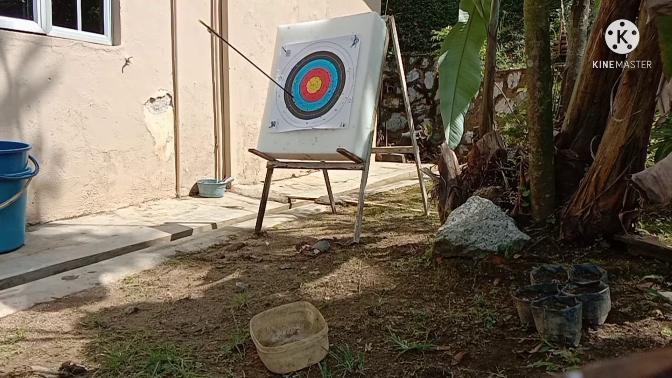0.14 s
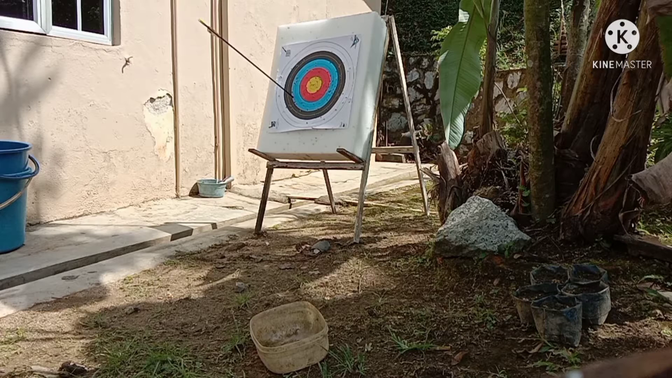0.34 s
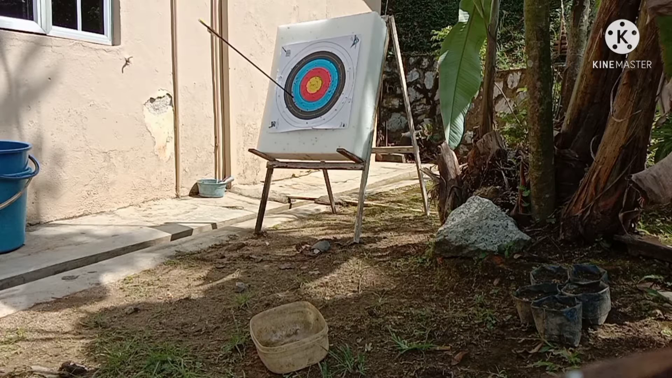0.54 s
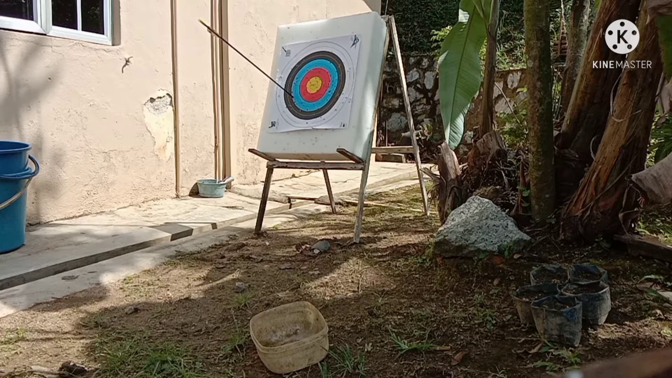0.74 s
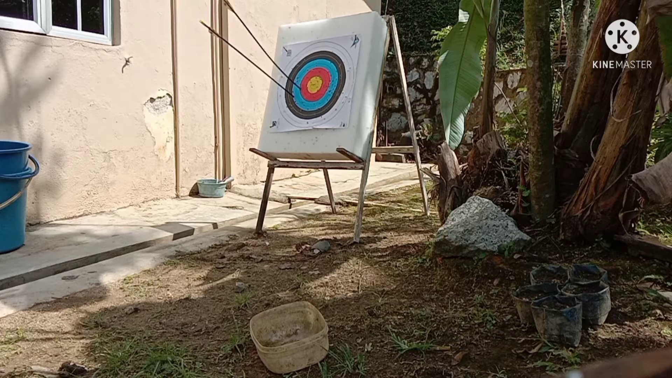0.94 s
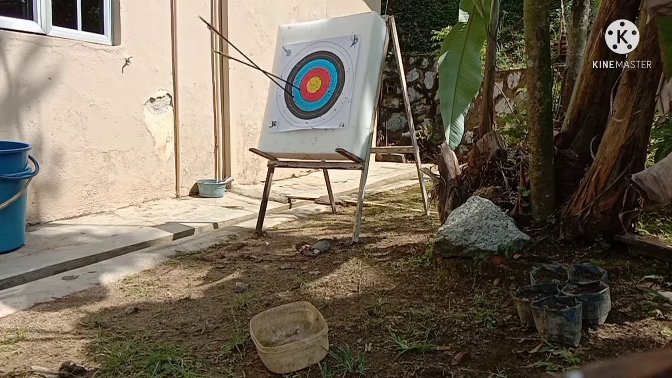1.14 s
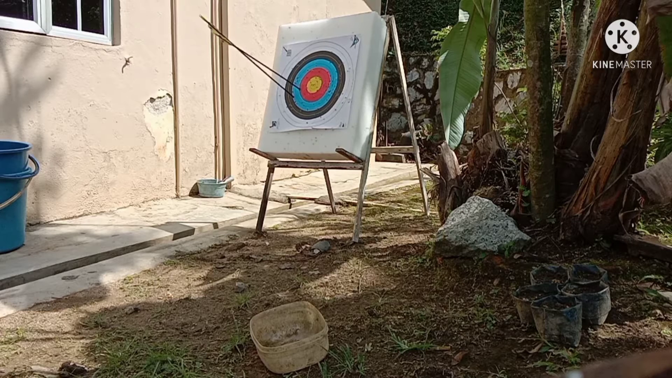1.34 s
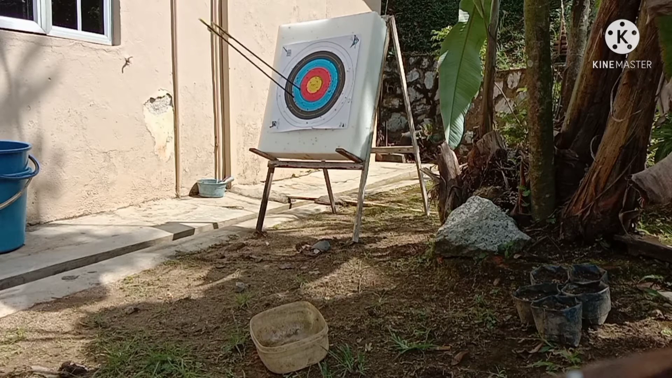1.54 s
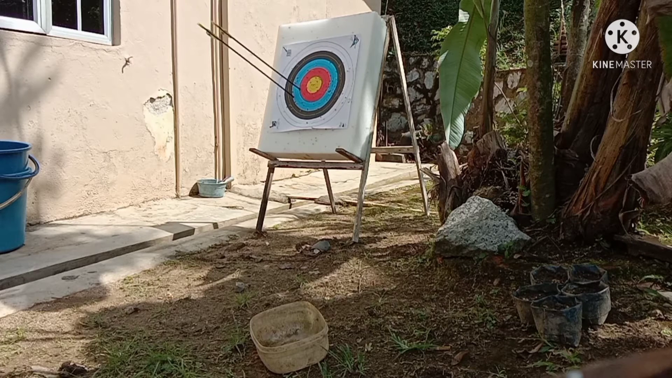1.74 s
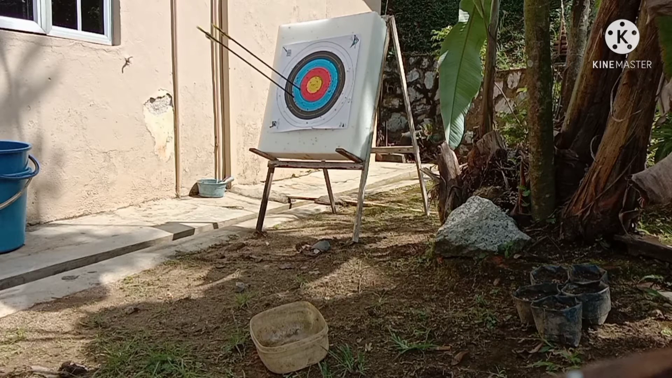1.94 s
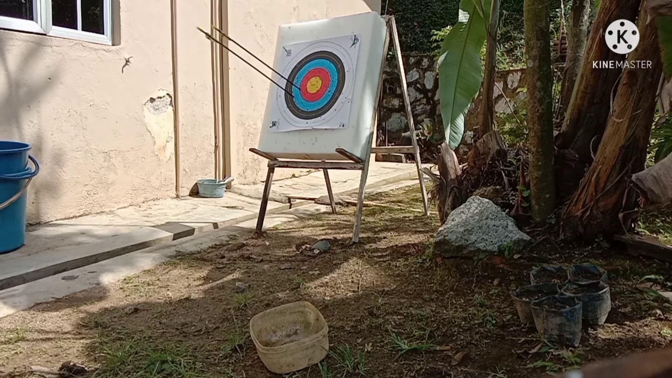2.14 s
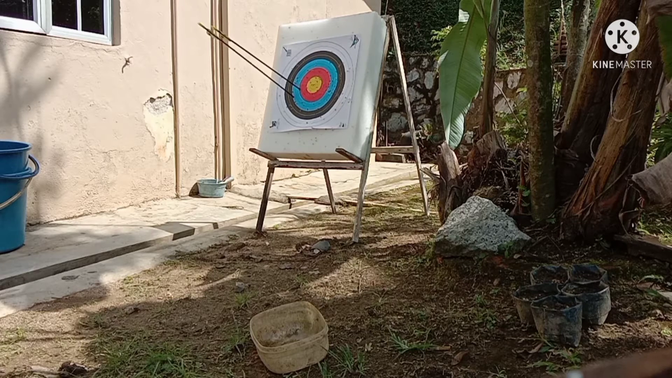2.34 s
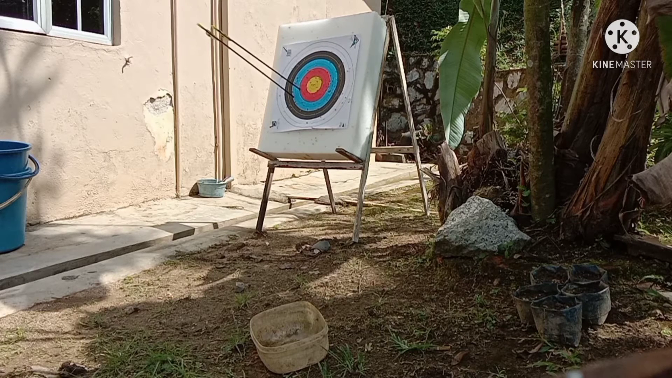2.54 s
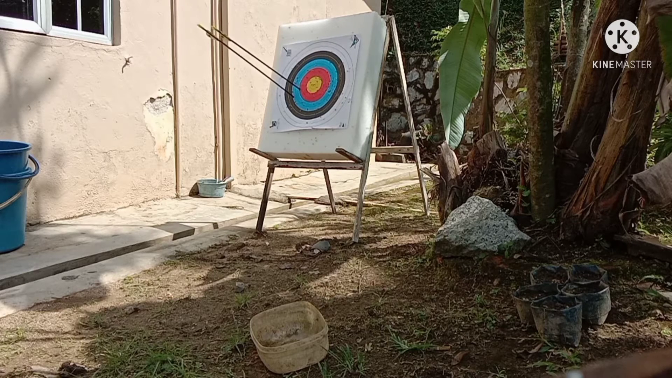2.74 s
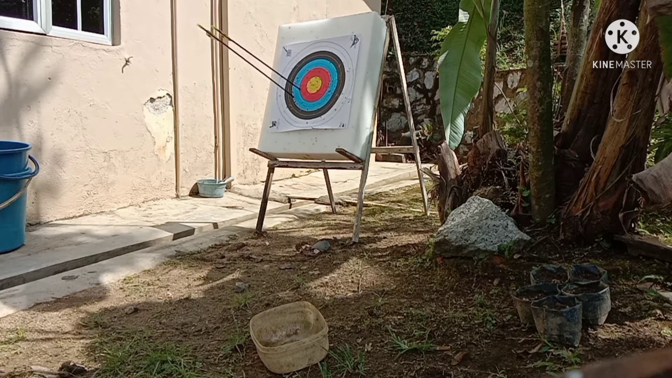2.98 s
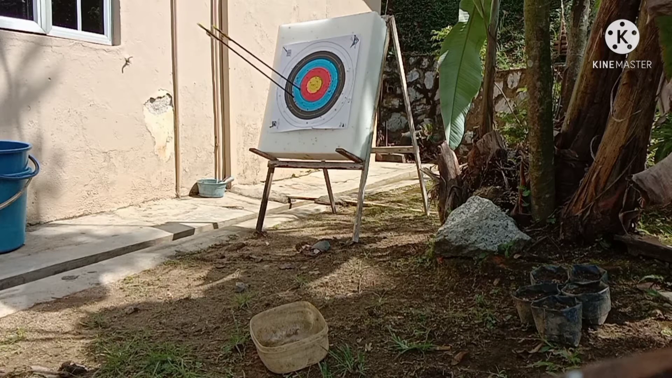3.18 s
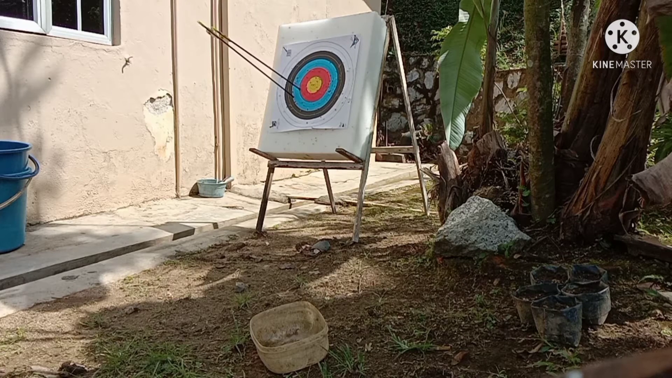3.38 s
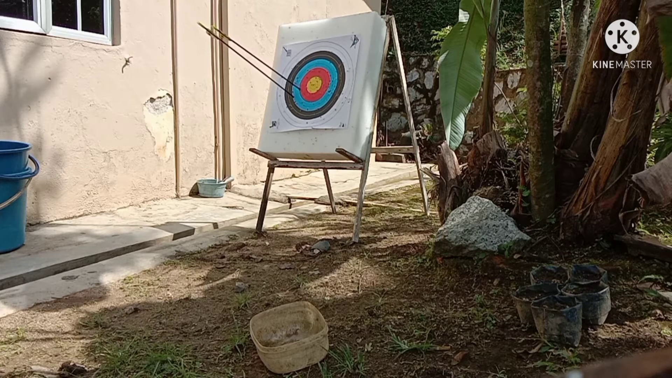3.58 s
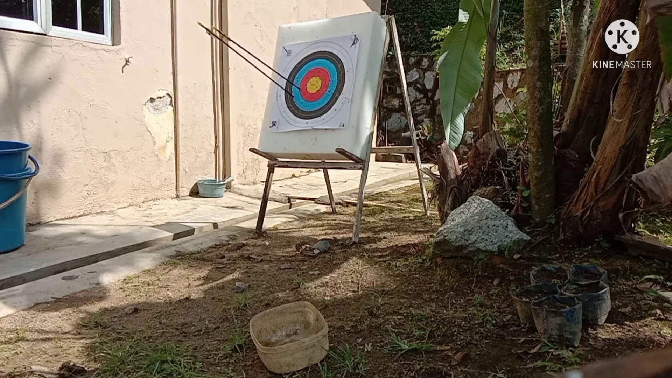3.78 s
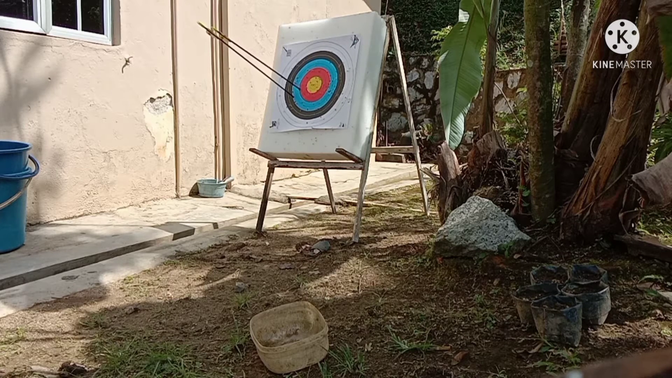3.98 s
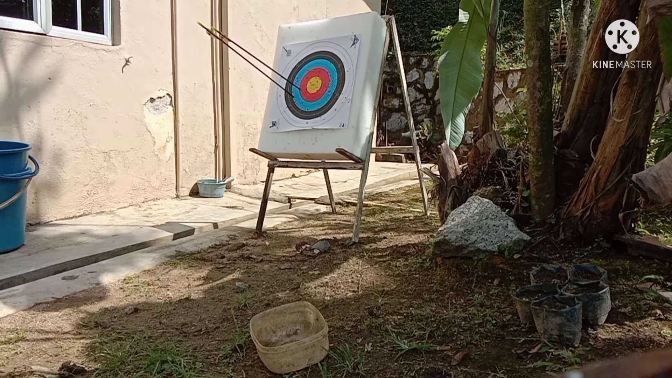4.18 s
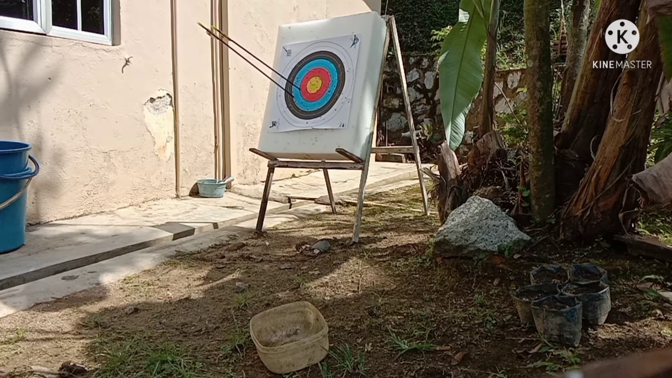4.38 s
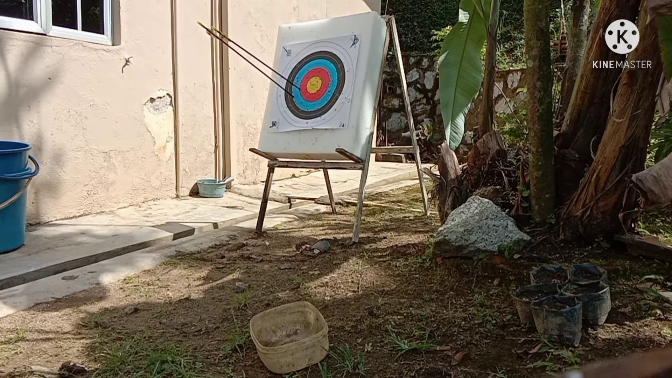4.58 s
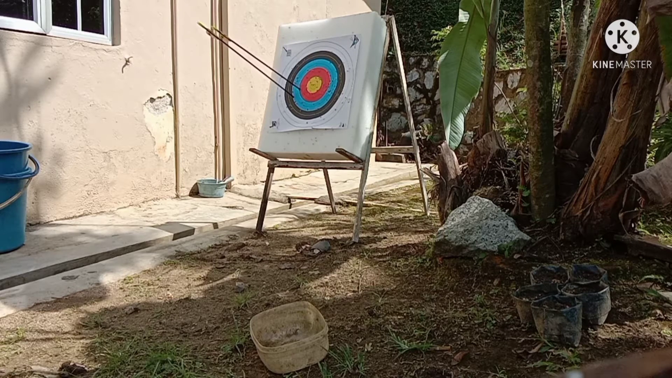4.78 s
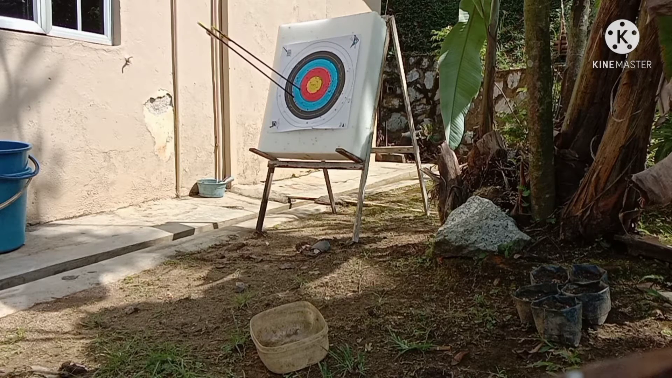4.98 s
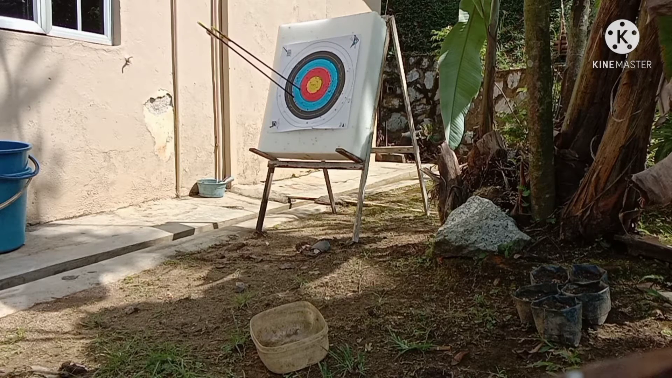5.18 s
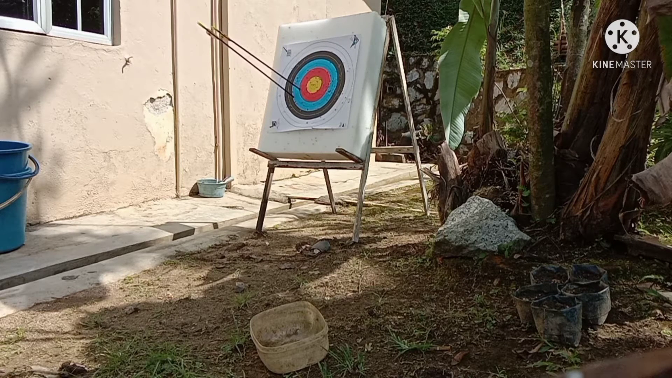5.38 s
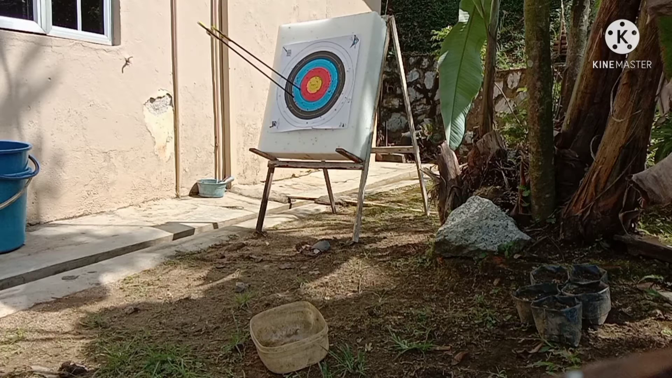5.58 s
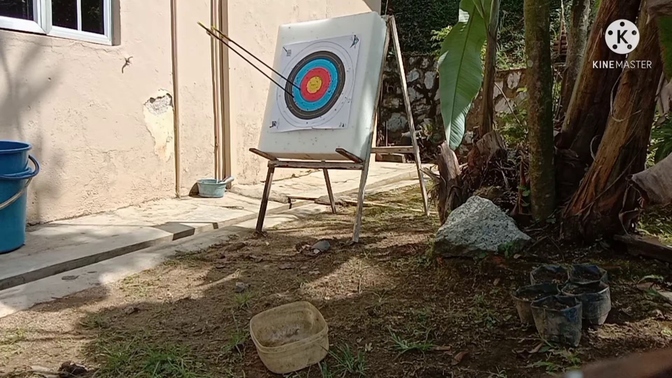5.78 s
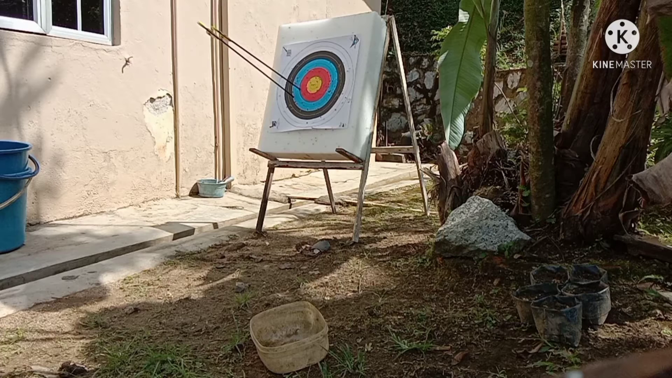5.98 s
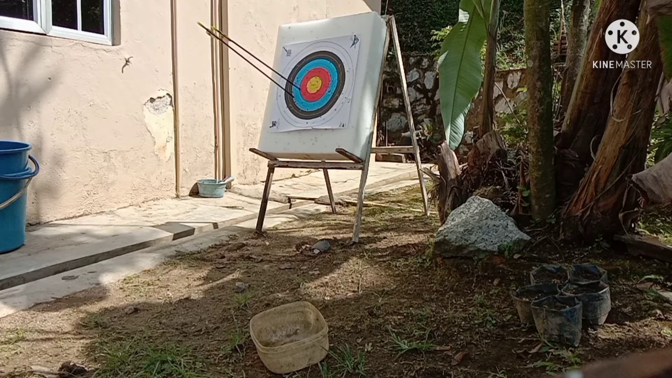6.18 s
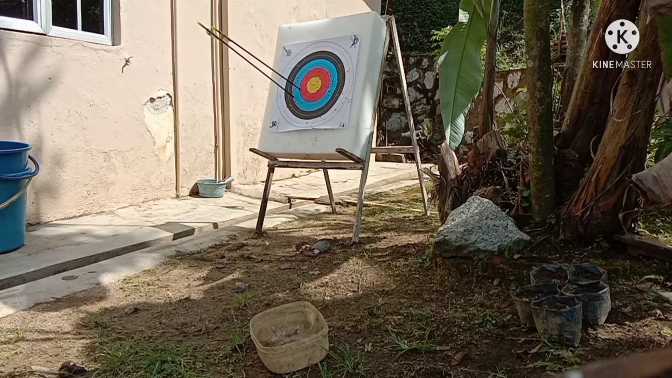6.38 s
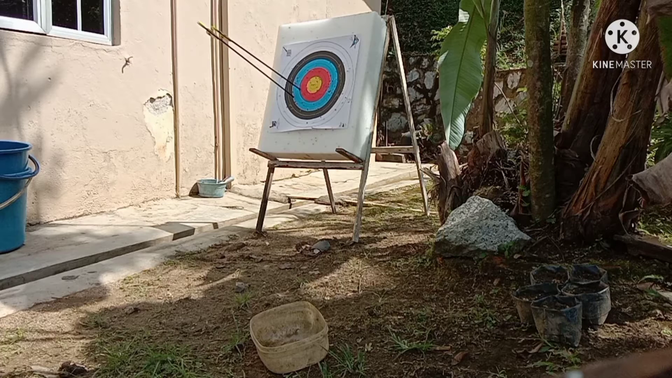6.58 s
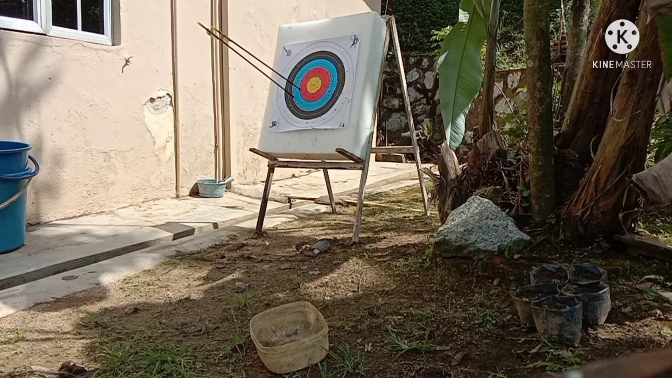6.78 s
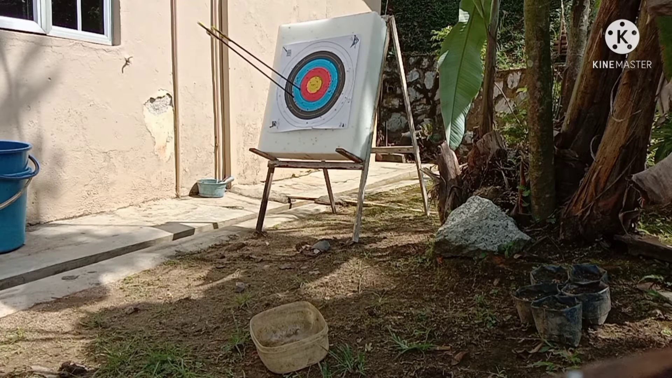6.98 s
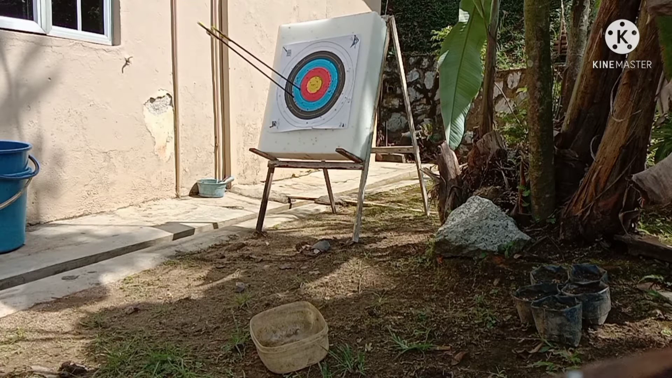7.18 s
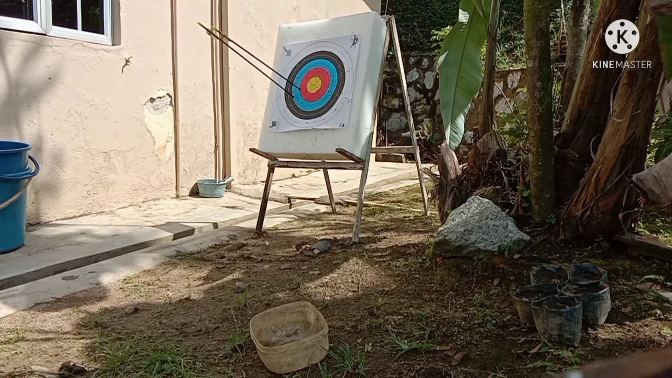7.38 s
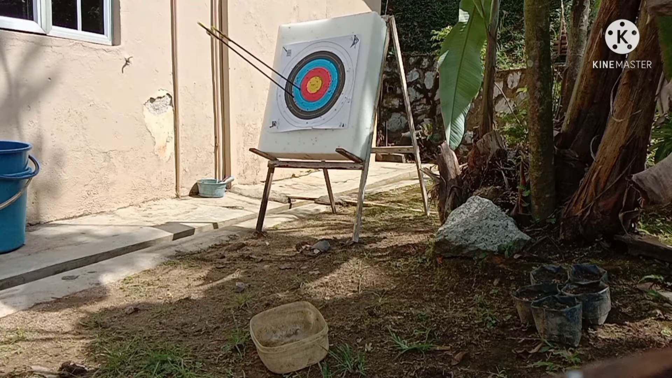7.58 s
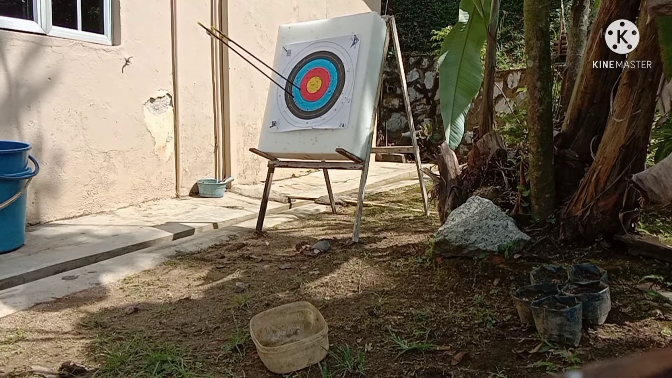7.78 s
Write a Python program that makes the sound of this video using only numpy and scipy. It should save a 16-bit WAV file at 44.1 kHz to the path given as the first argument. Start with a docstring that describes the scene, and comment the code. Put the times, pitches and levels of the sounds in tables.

```python
"""Archery in a walled garden.

The bow twangs and rattles; the arrow punches into a foam block on a wooden easel and a wall
throws the thud back. The lodged shaft quivers, spare arrows click together, the next is drawn.
Cicadas, crickets and katydids buzz over a distant rumble; far birds call faintly."""
import sys
import numpy as np
from scipy import signal
from scipy.fft import rfft, irfft, next_fast_len
from scipy.io import wavfile
from scipy.ndimage import uniform_filter1d, map_coordinates

SR = 44100
rng = np.random.default_rng(int(sys.argv[2]) if len(sys.argv) > 2 else 0)


def output_pcm(signal):
    """Save a mono or channel-first signal as 16-bit PCM at the path in sys.argv[1].

    Samples are clipped to [-1, 1] before scaling.
    """
    pcm = np.clip(np.atleast_2d(signal).T, -1, 1) * 32767
    wavfile.write(sys.argv[1], SR, np.round(pcm).astype(np.int16))


N = 345303
HIT_S = 0.9137

# garden reverberation: freq_hz, t60_s
GARDEN_DECAY = [(150, 0.45), (500, 0.5), (1000, 0.58), (3000, 0.47), (7000, 0.29), (14000, 0.22)]
# cicada hiss: freq_hz, density_db
CICADA_SPECTRUM = [(5500, -47), (5900, -36), (6080, -25), (6170, -11), (6400, -4), (6550, -15.5),
                   (6850, -9.5), (7020, -1.5), (7350, -1), (7720, -4.5), (8150, -15), (8500, -29.5),
                   (9500, -57.5), (13700, -35), (14500, -25.5), (15500, -29)]
# cricket choirs: pitch_hz, width_hz, level_db, pulse_hz, pulse_depth
CRICKET_CHOIRS = [(6192, 24, -68.5, 13, .65), (6300, 45, -72, 26, .4), (6362, 22, -68.5, 24, .5)]
# steady near cricket: start_s, length_s, level_db, pulse_depth, pulse_hz
STEADY_TRILLS = [(0, 3, -77, 0.5, 14), (2.802, 1.86, -74.5, 0.9, 16), (4.46, 1.62, -75, .75, 19),
                 (5.989, 1.15, -80.5, 0.6, 14), (7.09, 0.95, -89, 0.92, 15)]
# rising near cricket: start_s, length_s, start_hz, level_db
RISING_TRILLS = [(2.85, 4.1, 5920, -80), (6.9, 1.3, 5978, -72.5)]
# far, low cricket: start_s, length_s, pitch_hz, level_db
TREE_CRICKET_CHIRPS = [(.56, .13, 3060, -76), (1.33, 0.097, 3056, -76), (2.68, 0.053, 3050, -82),
                       (2.98, 0.072, 3060, -79), (3.61, .07, 3034, -78), (3.73, 0.063, 3050, -82.5),
                       (3.99, 0.072, 3047, -79), (4.29, 0.083, 3046, -79), (5.54, .08, 3080, -86),
                       (5.72, 0.084, 3040, -83), (6.3, .11, 3047, -77), (7.06, 0.23, 2950, -81)]
# far traffic and moving air: freq_hz, density_db
RUMBLE_SPECTRUM = [(20, -30), (45, -16), (70, -8.5), (100, 1), (140, -6), (180, -3.5), (260, -10),
                   (450, -21.5), (900, -62)]
RUSH_SPECTRUM = [(100, -21), (300, -3.5), (480, -3.5), (750, -0.5), (1150, -2.5), (1600, -10),
                 (2300, -16.5), (3500, -20.5), (5200, -27), (8500, -35), (10000, -78.5), (15000, -35.5)]
# soft bumps in the rumble: centre_s, level_db, pitch_hz
RUMBLE_BUMPS = [(0.035, -56, 98), (.49, -63.5, 325.5), (1.08, -53, 95.5), (1.156, -58.5, 110.2),
                (1.86, -60, 99), (2.129, -58, 98.06), (4.455, -60, 305.2), (5.22, -56.5, 97.6),
                (5.412, -62, 97), (6.138, -59, 100), (7.08, -62, 97.7), (7.68, -66.5, 300.7)]
# bird and katydid calls: start_s, length_s, pitch_hz, level_db
FAR_BIRD_NOTES = [(.13, 0.16, 744, -67), (.29, 0.052, 1280, -70.5), (.36, 0.039, 890, -65),
                  (.56, 0.084, 906, -68.5), (1.12, 0.14, 901, -63), (1.25, 0.19, 980, -64.5),
                  (1.86, 0.35, 895, -71), (6.84, .15, 1120, -72), (7.22, 0.051, 1254, -67),
                  (7.49, 0.13, 947, -65.5), (7.54, 0.097, 715, -67), (7.74, 0.072, 712, -66)]
KATYDID_PHRASES = [(0.18, 0.35, 12020, -80), (1.05, 1.54, 11710, -85.5), (3.22, 0.35, 12060, -76.5),
                   (3.6, 1.64, 11650, -88.5), (4.92, 0.37, 11740, -83), (5.3, 1.1, 12080, -104),
                   (6.35, 1.8, 11670, -89), (7.38, 0.42, 11920, -80.5)]
SMALL_BIRD_PEEPS = [(.452, .04, 3870, -73.5), (2.3, .09, 3655, -68.5), (2.644, 0.097, 3707, -67)]

# contacts of spare arrows, and of string, arrow and rest at release:
# start_s, level_db, tilt_db_per_decade, t60_s, ring_pitch_ratio, comb_spacing_hz
SHAFT_CONTACTS = [(0.14, -73, -21, 0.057, 1.12, 1330), (3.3135, -51.5, -6.5, 0.041, 1.0, 1620),
                  (3.3245, -56.5, -12, 0.06, 0.98, 1130), (3.4028, -44, -2, 0.02, 0.99, 1780),
                  (3.4052, -41.5, -14, 0.016, .99, 1420), (3.4118, -45, -7, 0.031, 1, 1760),
                  (3.4215, -49, -20, 0.031, 1, 1720), (3.4356, -32.5, 2.5, 0.0096, 1, 1530),
                  (3.4376, -39.5, 12, 0.012, 1, 1100), (3.4872, -49, 6, 0.014, .97, 1450),
                  (7.345, -75, -10, 0.06, .94, 800), (7.475, -75, -2, 0.081, 1.1, 2020)]
BOW_CONTACTS = [(0.7235, -44.5, -4.5, 0.16, 1.18, 1049), (0.7305, -43, 3.5, 0.06, 1, 1401),
                (0.7342, -45.5, 4, 0.16, 0.96, 948), (0.7587, -37, 9, .02, 0.81, 1020),
                (0.7624, -29, -5.5, .016, 1, 997.8), (0.767, -44.5, 3.5, .17, 1, 1900),
                (0.8192, -40, -5.5, 0.017, 1.3, 1020), (0.854, -51, -7.5, 0.034, 1.04, 999.4)]
# contact bursts: freq_hz, density_db
SHAFT_SPECTRUM = [(500, -44), (880, -22.5), (1300, -42), (1680, -14.5), (1950, -27), (2280, -5),
                  (2480, -13), (2700, -5.5), (3100, -4.5), (3650, -5), (4250, -8), (4700, -6.5),
                  (7500, -6.5), (9000, -17), (11000, -38), (14500, -19.5), (16000, -30)]
BOW_SPECTRUM = [(100, -30), (300, -26), (600, -18.5), (800, -19), (950, -26), (1200, -22.5), (1650, -29),
                (1950, -7), (2200, -4), (2450, -9), (2850, -8.5), (3850, -6.5), (4860, -11), (8050, -9.5),
                (11600, -26), (14700, -15), (16000, -27.5)]
# resonances rung by the contacts: centre_hz, width_hz, gain_db
SHAFT_RESONANCES = [(900, 27, 7), (1704, 40, -3.5), (2293, 29, 4.5), (2630, 29, 0), (3082, 39, 0),
                    (3320, 39, -8.5), (3610, 34, 2), (4500, 64, -3), (4770, 63, -2), (5320, 55, 1)]
BOW_RESONANCES = [(2180, 93, 2), (2880, 78, -6), (3445, 90, -5), (3900, 130, -1), (4610, 50, -6)]
# bowstring and bow limbs: freq_hz, level_db, t60_s
STRING_MODES = [(87.47, -51, 1), (119, -52.5, .77), (240.6, -66, 0.29)]
LIMB_MODES = [(604, -52.5, 0.46), (760, -54.5, 0.24), (1430, -54.5, 0.42)]

# paper face tearing, its scatter, block catching the shaft, block on easel: freq_hz, density_db
CRACK_SPECTRUM = [(25, -35), (55, -15), (150, -7.5), (330, -8.5), (480, -10), (600, -2.5), (790, -11.5),
                  (1100, -4.5), (1650, -6.5), (1880, -16.5), (2180, -6), (2650, -18), (3200, -5.5),
                  (5600, -23), (7700, -22), (10000, -41.5), (14500, -26.5), (16000, -41)]
SCATTER_SPECTRUM = [(150, -31), (280, -2), (360, -4.5), (520, -9), (800, -4.5), (1200, -5), (1900, -11),
                    (2700, -16), (3120, -9.5), (4900, -17.5), (7570, -21), (11100, -34.5), (14900, -26.5),
                    (16000, -51.5)]
CATCH_SPECTRUM = [(100, -20), (330, 3), (520, 3), (800, -10), (2200, -12), (3500, -10), (5500, -13),
                  (8000, -15), (10500, -30), (15000, -32)]
KNOCK_SPECTRUM = [(100, -24.5), (300, -6), (600, -1), (1000, 2), (1400, -7.5), (2200, -18), (3100, -13),
                  (5000, -24), (8000, -28.5), (14000, -42.5)]
# easel with lodged shaft, and foam block: freq_hz, gain_db, t60_s
EASEL_MODES = [(234, 0, 0.08), (297, -2.5, .11), (363, -2.5, .2), (471, -13, 0.211), (562, -11, 0.27),
               (601, -4, .2), (726, -10, 0.19), (794, -11, 0.19), (950, -8, 0.3), (1028, -10, .25),
               (1100, -8.5, .25), (1220.3, -5.5, 0.23), (1328, -11.5, 0.27), (1404, -6, 0.12),
               (1616, -7.5, 0.17), (1740, -16, 0.17), (2210, -12.5, .08), (2510, -20, 0.26),
               (2990, -18, 0.3), (3120, -13.5, .22), (3476, -15, 0.12), (3840, -19.5, .2)]
BLOCK_MODES = [(134.1, -5.5, 0.18), (178, -2, 0.19)]
# buzz of the lodged shaft: centre_hz, width_hz, gain_db
BUZZ_RESONANCES = [(900, 22, 0), (1180, 25, 1), (1683, 28, 0), (2150, 45, -3), (3090, 35, 1),
                   (3120, 50, -5), (3690, 50, -9.5), (3900, 40, -2), (4100, 40.04, -6), (5270, 25, -5)]
# block rocking against the easel: start_s, level_db
BLOCK_KNOCKS = [(0.9395, -30), (0.9525, -28.5), (0.9612, -31)]

# handled shafts squeaking: start_s, length_s, pitch_hz, level_db
SHAFT_BRUSHES = [(2.2, 0.14, 4650, -83), (2.9, 0.067, 1830, -79), (3.17, .16, 2390, -76),
                 (4.69, .06, 1580, -65), (4.945, .065, 2940, -68)]
# pulls of the draw: start_s, length_s, level_db, pitch_ratio, fall_ratio, hiss_db
DRAW_PULLS = [(4.441, 0.4, -59.5, 1, 0.01, -0.5), (4.829, 0.19, -68.5, 0.92, 0.1186, -9)]
# tones of the sliding shaft: pitch_hz, width_hz, gain_db
RUB_TONES = [(1620, 57, -6.5), (1890, 36, -12), (2480, 85, -6), (2875, 120, -6.5), (3220, 72, -1),
             (3760, 190, -2.5), (4110, 130, 0), (4640, 97, -6.5)]
# hiss of the sliding shaft: freq_hz, density_db
RUB_SPECTRUM = [(900, -29.5), (2200, -15), (2650, -1.5), (3900, -1.5), (4700, -7), (5300, -13), (8500, -21),
                (10500, -56)]


def amp(db):
    """Decibels to gain."""
    return 10 ** (np.asarray(db) / 20)


def unit(x):
    """Scale to rms 1."""
    return x / np.sqrt(np.mean(x ** 2) + 1e-20)


def along(points, hz):
    """Interpolate (freq_hz, value) points on a log axis."""
    freqs_hz, values = np.transpose(points)
    return np.interp(np.log(hz + 1), np.log(freqs_hz + 1), values)


def wobble(rate_hz, size=N):
    """Smooth random curve with knots at rate_hz."""
    knots = rng.standard_normal(int(size * rate_hz / SR) + 4)
    return map_coordinates(knots, [np.arange(size) * rate_hz / SR])


def filtered(x, response):
    """Apply a frequency response."""
    size = next_fast_len(len(x) + SR // 4)
    return irfft(rfft(x, size) * response(np.fft.rfftfreq(size, 1 / SR)), size)[:len(x)]


def noise(spectrum, size):
    """Coloured noise, rms 1."""
    return unit(filtered(rng.standard_normal(size), lambda hz: amp(along(spectrum, hz))))


def band(hz, width_hz, size):
    """Blurred line around a fixed or gliding pitch, rms about 1."""
    lowpass = lambda f: 1 / (1 + (f / width_hz) ** 2) ** 2
    real, imag = [unit(filtered(rng.standard_normal(size), lowpass)) for _ in range(2)]
    cycles = np.cumsum(np.broadcast_to(hz, size)) / SR
    return np.real((real + 1j * imag) * np.exp(2j * np.pi * cycles))


def ringing(modes, t):
    """Sum of decaying sines."""
    return sum(amp(db - 60 * t / t60_s) * np.sin(2 * np.pi * hz * t) for hz, db, t60_s in modes)


def attack(t, rise_s):
    """Exponential onset."""
    return 1 - np.exp(-t / rise_s)


def add(track, start_s, sound):
    """Mix sound into track."""
    part = track[round(start_s * SR):][:len(sound)]
    part += sound[:len(part)]


def garden_decay(x):
    """Fade each frequency at the garden's rate."""
    hz, t, bins = signal.stft(x, SR, nperseg=256)
    fade = amp(-60 * t / along(GARDEN_DECAY, hz)[:, None])
    return signal.istft(bins * fade, SR, nperseg=256)[1][:len(x)]


def reverb(x, wet_db):
    """Add the diffuse return from walls and trees."""
    tail = garden_decay(rng.standard_normal(SR // 2))
    return x + amp(wet_db) * signal.fftconvolve(x, tail / np.linalg.norm(tail))[:len(x)]


def whistles(calls, rise_ratio, width_hz):
    """Distant notes, blurred by foliage."""
    out = np.zeros(N)
    for start_s, length_s, hz, db in calls:
        size = int(length_s * SR)
        glide_hz = hz * (1 + rise_ratio * np.linspace(-.5, .5, size))
        add(out, start_s, amp(db) * band(glide_hz, width_hz, size) * signal.windows.tukey(size, .5))
    return out


def cicadas(start_db=-60.5, fade_db_per_s=0.34):
    """Broad hiss, slowly easing off."""
    t = np.arange(N) / SR
    return amp(start_db - fade_db_per_s * t + .3 * wobble(14)) * noise(CICADA_SPECTRUM, N)


def trill(hz, pulse_hz, depth, drift_hz):
    """One cricket: a near-pure wing tone in quick, uneven pulses."""
    strokes = np.cumsum(pulse_hz * (1 + .2 * wobble(11))) / SR
    tone = np.sin(2 * np.pi * np.cumsum(hz + drift_hz * wobble(78)) / SR)
    pulses = 1 - depth * np.cos(np.pi * strokes) ** 2
    return amp(1.2 * wobble(8)) * unit(tone * pulses)


def cricket_choirs(blur_db=-1):
    """In each choir one pulsing voice leads the blur of the rest."""
    out = np.zeros(N)
    for hz, width_hz, db, pulse_hz, depth in CRICKET_CHOIRS:
        leader = trill(hz, pulse_hz, depth, drift_hz=11)
        out += amp(db) * unit(leader + amp(blur_db) * band(hz, width_hz, N))
    return out


def near_crickets(steady_hz=5697, rise_hz_per_s=36):
    """One cricket holds its pitch; a second joins late and creeps upward in each trill."""
    out, t = np.zeros(N), np.arange(N) / SR

    def bout(song, length_s):
        size = int(length_s * SR)
        return song[:size] * signal.windows.tukey(size, .05)

    for start_s, length_s, db, depth, pulse_hz in STEADY_TRILLS:
        song = trill(steady_hz, pulse_hz, depth, drift_hz=6.4)
        add(out, start_s, amp(db) * bout(song, length_s))
    for start_s, length_s, hz, db in RISING_TRILLS:
        song = trill(hz + rise_hz_per_s * t, pulse_hz=13, depth=0.81, drift_hz=14)
        add(out, start_s, amp(db) * bout(song, length_s))
    return out


def tree_cricket(pitch_hz=3055, line_db=-93):
    """Far, low cricket: clear chirps over a faint steady line."""
    line = amp(line_db) * band(pitch_hz, width_hz=45, size=N)
    chirps = whistles(TREE_CRICKET_CHIRPS, rise_ratio=0, width_hz=55)
    return line + reverb(chirps, wet_db=-6)


def air_drift(x, depth_db):
    """Drifting air lifts and drops small patches of a far sound's spectrum."""
    bins = signal.stft(x, nperseg=1024)[2]
    patches = uniform_filter1d(rng.standard_normal(bins.shape), size=4, axis=0)
    patches = unit(uniform_filter1d(patches, size=7, axis=1))
    return unit(signal.istft(bins * amp(depth_db * patches), nperseg=1024)[1][:N])


def far_traffic(rumble_db=-66, waver_db=1.86, bump_s=0.072, rush_db=-70):
    """Traffic and moving air: uneven rumble, low bumps and a soft rush."""
    rumble = amp(rumble_db + waver_db * wobble(13)) * noise(RUMBLE_SPECTRUM, N)
    size = int(bump_s * SR)
    for centre_s, db, hz in RUMBLE_BUMPS:
        bump = np.hanning(size) * band(hz, width_hz=39, size=size)
        add(rumble, centre_s - bump_s / 2, amp(db) * bump)
    rush = amp(rush_db + 0.33 * wobble(21)) * air_drift(noise(RUSH_SPECTRUM, N), depth_db=2.5)
    return rumble + rush


def far_birds(faint_count=6, faint_s=0.15, faint_hz=922, spread_octaves=0.49, faint_db=-71.5):
    """Clear, slightly rising notes among fainter random ones."""
    faint = [(when * N / SR, faint_s, faint_hz * 2 ** (spread_octaves * (2 * pitch - 1)), faint_db)
             for when, pitch in rng.random((faint_count, 2))]
    return reverb(whistles(FAR_BIRD_NOTES + faint, rise_ratio=0.0091, width_hz=110), wet_db=-6.5)


def rattle(contacts, spectrum, resonances, ring_db, wet_db, rise_s, comb_db, vary_db=0.5):
    """Each contact's burst rings the shaft; the reflection from its end forms a comb filter."""
    out, t = np.zeros(N), np.arange(SR // 2) / SR
    balances_db = vary_db * rng.standard_normal((len(contacts), len(resonances)))
    for (start_s, db, tilt_db, t60_s, pitch_ratio, spacing_hz), lifts_db in zip(contacts, balances_db):
        def response(hz):
            f = hz / pitch_ratio
            ring = sum(amp(gain_db + lift_db) * 1j * f * width / (centre**2 - f**2 + 1j * f * width)
                       for (centre, width, gain_db), lift_db in zip(resonances, lifts_db))
            comb = 1 + amp(comb_db) * np.exp(-2j * np.pi * hz / spacing_hz)
            return (1 + amp(ring_db) * ring) * comb

        tilted = [(hz, density_db + tilt_db * np.log10(hz / 3000)) for hz, density_db in spectrum]
        burst = amp(db - 60 * t / t60_s) * attack(t, rise_s) * noise(tilted, len(t))
        add(out, start_s, reverb(filtered(burst, response), wet_db))
    return out


def spare_arrows():
    """Spare shafts click together."""
    return rattle(SHAFT_CONTACTS, SHAFT_SPECTRUM, SHAFT_RESONANCES,
                  ring_db=12, wet_db=-8, rise_s=0.00031, comb_db=-6)


def katydids(stutter_hz=19, gap_db=-13):
    """Thin high phrases with short, uneven gaps."""
    gaps = (1 - np.tanh(4 * wobble(stutter_hz) + 2.6)) / 2
    return whistles(KATYDID_PHRASES, rise_ratio=0.0089, width_hz=49) * amp(gap_db * gaps)


def small_bird(attack_s=0.012, rise_ratio=0.0196, width_hz=70):
    """Buzzy peeps start abruptly, lift a little and fade."""
    out = np.zeros(N)
    for start_s, length_s, hz, db in SMALL_BIRD_PEEPS:
        t = np.arange(int(length_s * SR)) / SR
        tone = band(hz * (1 + rise_ratio * t / length_s), width_hz, len(t))
        envelope = np.minimum(t / attack_s, 1) * np.sqrt(1 - t / length_s)
        add(out, start_s, amp(db) * envelope * tone)
    return reverb(out, wet_db=-7.5)


def bow_release(slip_s=.7, straight_s=0.7635, flick_lag_s=0.0057, flick_db=-42, flick_t60_s=0.052):
    """The string flicks off the fingers, twangs and snaps straight; limbs ring, the arrow rattles."""
    out, t = np.zeros(N), np.arange(SR) / SR
    add(out, slip_s, ringing(STRING_MODES, t) * attack(t, 0.0088))
    flick = amp(flick_db - 60 * t / flick_t60_s) * band(hz=5800, width_hz=1700, size=SR)
    add(out, slip_s + flick_lag_s, flick)
    add(out, straight_s, ringing(LIMB_MODES, t) * attack(t, 0.021))
    return out + rattle(BOW_CONTACTS, BOW_SPECTRUM, BOW_RESONANCES,
                        ring_db=2, wet_db=-3, rise_s=0.00025, comb_db=-9.5)


def punch(t, start_hz=1700, end_hz=850, stop_s=.006):
    """The shaft squeaks into the foam, falling in pitch as it brakes."""
    hz = end_hz + (start_hz - end_hz) * np.exp(-t / stop_s)
    phase = 2 * np.pi * np.cumsum(hz) / SR
    overtone = amp(-6 - 60 * t / .02) * np.sin(2 * phase)
    grip = (1 + 0.29 * t / stop_s) * np.exp(-(t / stop_s) ** 8)  # grows with depth, ends abruptly
    return -(np.sin(phase) + overtone) * grip


def arrow_hit(gain_db=-13.5, block_lag_s=0.0057, block_stop_s=.054, near_echo_s=.0772, far_echo_s=0.21):
    """The point cracks the paper face; the block drums, the easel rings, the walls answer."""
    out, t = np.zeros(N), np.arange(SR) / SR
    crack = amp(-1 - 60 * t / 0.041) * noise(CRACK_SPECTRUM, SR)
    strike = amp(-4.3) * punch(t) + crack
    easel = amp(-10.5) * ringing(EASEL_MODES, t) * attack(t, 0.0019)
    scatter = amp(-12 - 60 * t / 1.1) * garden_decay(noise(SCATTER_SPECTRUM, SR)) * attack(t, .006)
    add(out, HIT_S, strike + easel + scatter)

    friction_stop = np.exp(-(t / block_stop_s) ** 6)  # the easel brakes the block's swing
    drum = amp(0.5) * ringing(BLOCK_MODES, t) * attack(t, 0.0068) * friction_stop
    squeak = ringing([(7840, -7, 0.0068)], t)
    catch = amp(-10 - 60 * t / 0.012) * noise(CATCH_SPECTRUM, SR)
    add(out, HIT_S + block_lag_s, drum + squeak + catch)

    # near wall: bright slap and weaker thump; far wall: faint smear
    wall_hz_db = [(300, -7), (1400, -3), (2500, 6.5), (7000, 9), (12000, -2)]
    slap = filtered(strike + scatter, lambda hz: amp(along(wall_hz_db, hz)))
    add(out, HIT_S + near_echo_s, amp(-18.5) * (slap + amp(-14) * easel))
    add(out, HIT_S + block_lag_s + near_echo_s, amp(-15) * drum)
    add(out, HIT_S + far_echo_s, amp(-58) * reverb(slap + easel, wet_db=12))
    return amp(gain_db) * out


def shaft_quiver(swing_hz=31, level_db=-45, t60_s=0.71, ring_floor=.6):
    """The lodged shaft buzzes in its hole once per swing."""
    out, t = np.zeros(N), np.arange(SR) / SR
    buzz = unit(sum(amp(db) * band(hz, width_hz, SR) for hz, width_hz, db in BUZZ_RESONANCES))
    swings = unit(ring_floor + np.sin(np.pi * swing_hz * t) ** 2)
    add(out, HIT_S, amp(level_db - 60 * t / t60_s) * swings * buzz)
    return out


def block_knocks(t60_s=0.057):
    """The block rocks against the easel with dull knocks."""
    out, t = np.zeros(N), np.arange(SR // 4) / SR
    for start_s, db in BLOCK_KNOCKS:
        envelope = amp(db - 60 * t / t60_s) * attack(t, .0007)
        add(out, start_s, envelope * noise(KNOCK_SPECTRUM, len(t)))
    return out


def shaft_brushes(width_hz=80):
    """Handled shafts slide with thin, blurred squeaks."""
    out = np.zeros(N)
    for start_s, length_s, hz, db in SHAFT_BRUSHES:
        size = int(length_s * SR)
        add(out, start_s, amp(db) * np.hanning(size) * band(hz, width_hz, size))
    return out


def bow_draw(sag_ratio=.05, wander_ratio=.014, wander_rate_hz=22, catch_db=1.5, catch_rate_hz=35):
    """The shaft rubs over the rest; level and pitch follow pull speed, each tone wanders and catches."""
    out = np.zeros(N)
    for start_s, length_s, db, pitch_ratio, fall_ratio, hiss_db in DRAW_PULLS:
        size = int(length_s * SR)
        speed = np.sin(np.linspace(0, np.pi, size))
        glide = pitch_ratio * (1 - sag_ratio * (1 - speed) - fall_ratio * np.linspace(-.5, .5, size))
        tones = np.zeros(size)
        for hz, width_hz, gain_db in RUB_TONES:
            pitch_hz = hz * glide * (1 + wander_ratio * wobble(wander_rate_hz, size))
            gain = amp(gain_db + catch_db * wobble(catch_rate_hz, size))
            tones += gain * band(pitch_hz, width_hz, size)
        hiss = amp(hiss_db) * speed * noise(RUB_SPECTRUM, size)
        add(out, start_s, amp(db) * np.abs(speed) ** 0.89 * unit(unit(tones) + hiss))
    return reverb(out, wet_db=-14.5)


def scene():
    """Shot, hit, spare arrows and next draw over the garden; mono."""
    bow = bow_release()
    spares = shaft_brushes() + spare_arrows()
    insects = cicadas() + cricket_choirs() + near_crickets() + tree_cricket() + katydids()
    garden = insects + far_birds() + small_bird() + far_traffic()
    target = arrow_hit() + block_knocks() + shaft_quiver()
    return (garden + bow + target + spares + bow_draw())[None]


def record(dry):
    """Soft peak limit, bass cut and band limit."""
    ceiling, bass_hz, top_hz = .42, 48, 15700
    rounded = dry / (1 + (dry / ceiling) ** 6) ** (1 / 6)
    thinned = signal.sosfilt(signal.butter(2, bass_hz, "high", fs=SR, output="sos"), rounded)
    return np.array([filtered(channel, lambda hz: hz < top_hz) for channel in thinned])


dry = scene()
out = record(dry)
output_pcm(out)
```